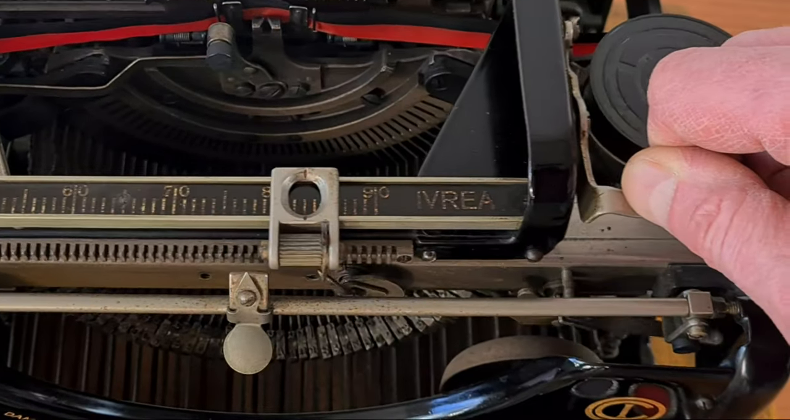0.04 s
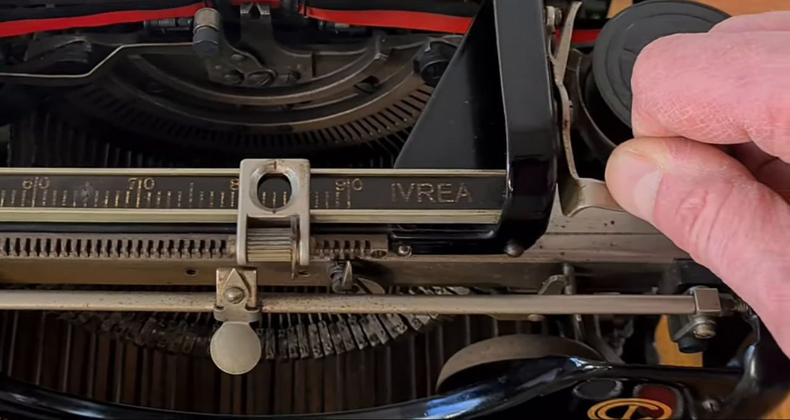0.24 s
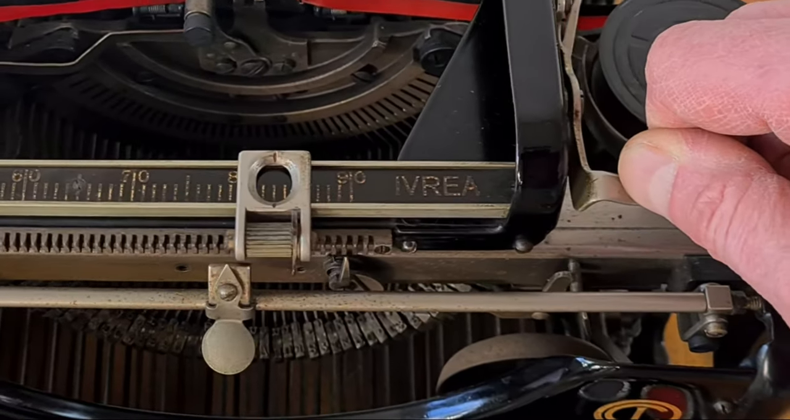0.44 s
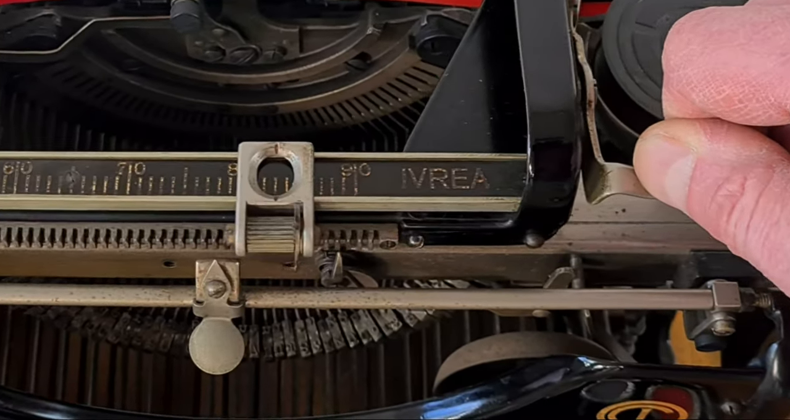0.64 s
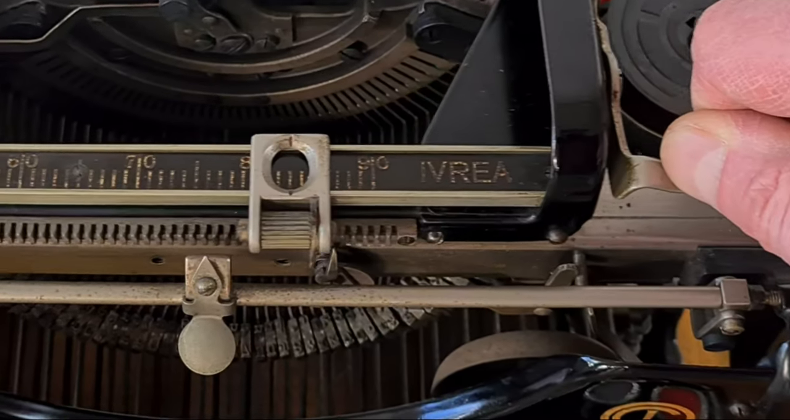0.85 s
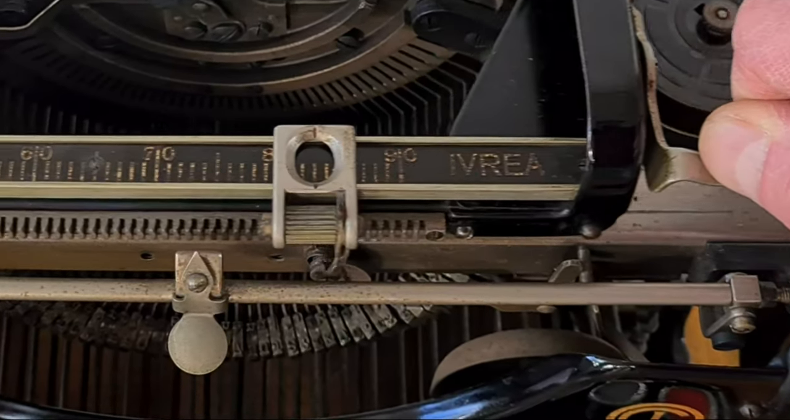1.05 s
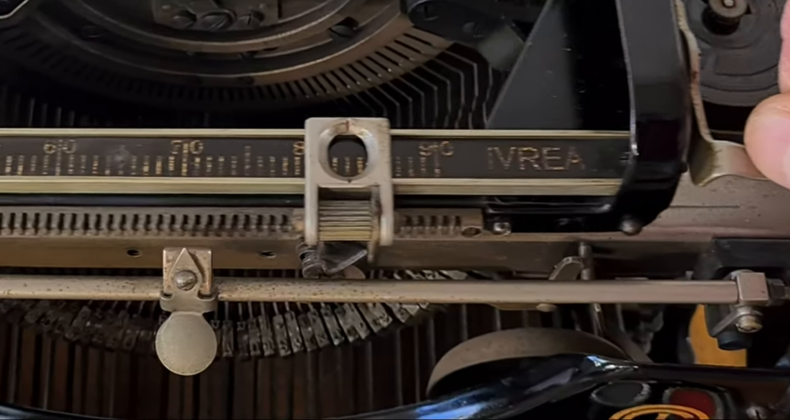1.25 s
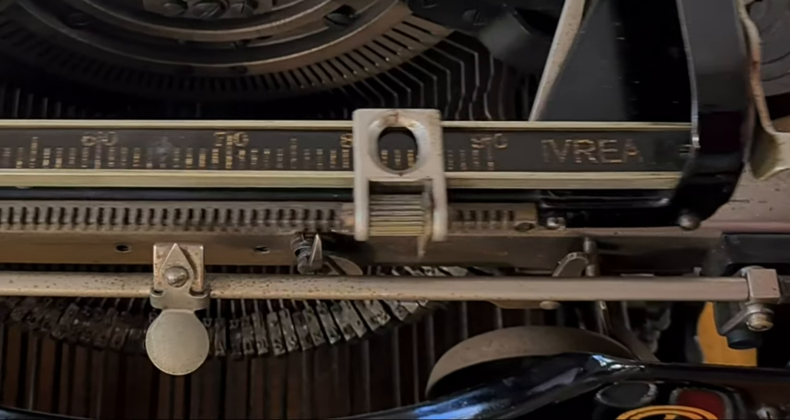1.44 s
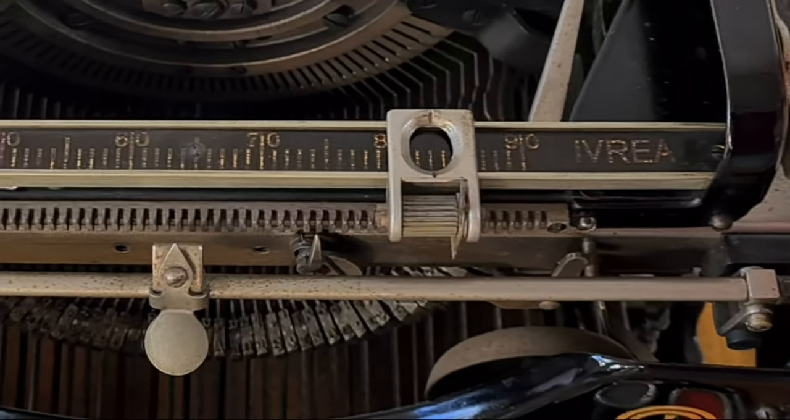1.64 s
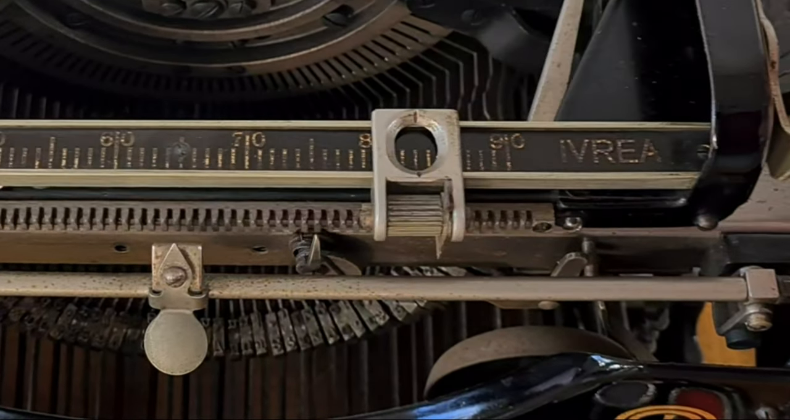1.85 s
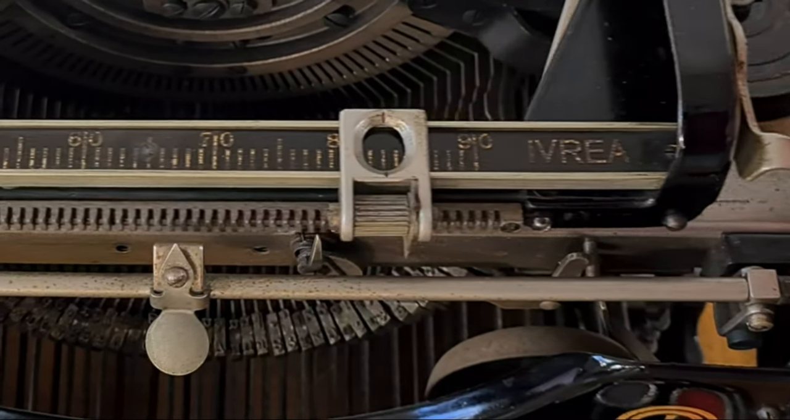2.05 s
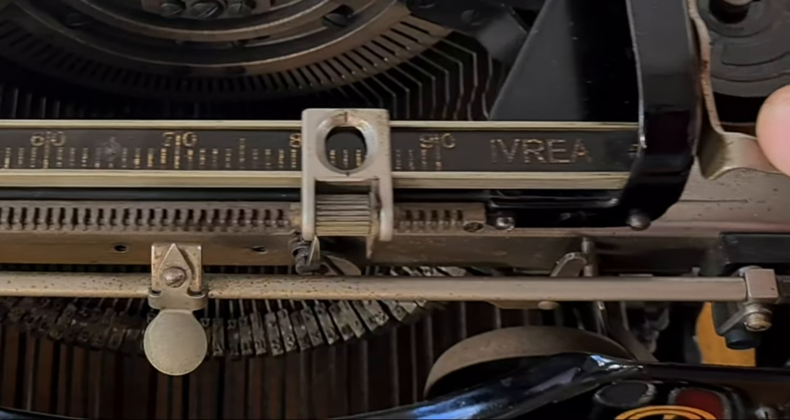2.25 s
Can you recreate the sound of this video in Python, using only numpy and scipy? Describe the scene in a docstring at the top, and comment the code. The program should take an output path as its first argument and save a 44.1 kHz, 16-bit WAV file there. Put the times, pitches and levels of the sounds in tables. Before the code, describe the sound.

Single bright ding of an old typewriter's margin bell, then a sharp metal click a second later.

```python
"""A small room with a low rumble and faint hiss, heard in stereo from close beside an old typewriter.
A hand slides the carriage along and the margin bell dings: the clapper makes the frame clack (coloured
noise and wavering sine modes) and the little bell rings on as decaying sines, mostly in beating pairs.
Faint ticks of shaped noise follow from the carriage. A second after the ding the trip pawl snaps back
with a dry click, noise and short sine modes, then hums briefly as it comes to rest."""
import sys
import numpy as np
from scipy import signal
from scipy.fft import rfft, irfft
from scipy.io import wavfile

SR = 44100
rng = np.random.default_rng(int(sys.argv[2]) if len(sys.argv) > 2 else 0)


def wrap_up_sound(samples):
    """Save the sound to the file named by the first command line argument, as 16-bit audio."""
    columns = np.atleast_2d(samples).T
    # keep every value between -1 and 1, then stretch to whole-number steps
    tamed = np.clip(columns, -1, 1)
    steps = np.round(tamed * 32767).astype(np.int16)
    wavfile.write(sys.argv[1], SR, steps)


N = 101430   # 2.3 s
STRIKE_S = 0.2283   # the bell and the frame start to ring
SIDES = np.array([[1], [-1]])   # left, right


def from_db(db):
    """Decibels to gain."""
    return 10 ** (np.asarray(db) / 20)


def at_hz(points, hz):
    """Read a table on a log-frequency axis."""
    f, value = np.transpose(points)
    return np.interp(np.log(np.maximum(hz, 1)), np.log(f), value)


def spectrum_hz():
    """Frequencies of the spectrum of a whole-scene signal."""
    return np.arange(N // 2 + 1) * SR / N


def since(s):
    """Seconds since a moment, zero before it."""
    return np.maximum(np.arange(N) / SR - s, 0)


def spread(amount):
    """Half of an amount to the left, minus half to the right."""
    return SIDES * amount / 2


def envelope(t, rise, t60):
    """Quick rise (time constant in s), then exponential decay by 60 dB in t60 seconds."""
    return (1 - np.exp(-t / rise)) * np.exp(-np.log(1000) * t / t60)


def noise(colour, likeness):
    """Stereo noise of a given colour and left-right likeness (correlation), mixed from mid and side; rms 1."""
    mid, side = rfft(rng.standard_normal((2, N)))
    alike = np.clip(likeness, -1, 1)
    stereo = np.sqrt(1 + alike) * mid + np.sqrt(1 - alike) * side * SIDES
    x = irfft(stereo * from_db(at_hz(colour, spectrum_hz())), N)
    return x / np.sqrt(np.mean(x ** 2))


RIPPLE_DB, RIPPLE_STEP_HZ = 1.5, 110.5   # standard deviation and spacing of the peaks and valleys


def uneven(colour):
    """A colour broken up into many random peaks and valleys, as crowded metal resonances give."""
    hz = np.arange(1, 200) * RIPPLE_STEP_HZ
    return np.c_[hz, at_hz(colour, hz) + RIPPLE_DB * rng.standard_normal(len(hz))]


# decay of the small room: pitch_hz, t60_s
ROOM_DECAY = [(200, .6), (1000, .55), (4000, .6), (8000, .42), (15000, .36)]
ROOM_RISE_S, ROOM_LIKENESS = 0.008, 0.15


def room_tail(colour, s):
    """Diffuse tail of one contact: crossfaded bands of one noise, dying fastest at the top."""
    hz, t = spectrum_hz(), since(s)
    wash = rfft(noise(colour, ROOM_LIKENESS))
    centres = np.array(ROOM_DECAY)[:, 0]
    tail = 0
    for (_, t60), share in zip(ROOM_DECAY, np.eye(len(ROOM_DECAY))):
        band = irfft(wash * at_hz(np.c_[centres, share], hz), N)
        tail = tail + band * envelope(t, ROOM_RISE_S, t60)
    return tail


CONTACT_RISE_S, AFTER_RING_T60_S, CONTACT_LIKENESS = 0.0008, 0.17, 0.31


def clatter(contacts, colour, crack_t60, ring_db, room_db):
    """Each contact is a noise crack with a longer ring of dense metal resonances, and the room answers.

    ring_db and room_db are relative to the crack."""
    colour = uneven(colour)
    out = 0
    for s, db, pan in contacts:
        t = since(s)
        crack = envelope(t, CONTACT_RISE_S, crack_t60)
        after_ring = from_db(ring_db) * envelope(t, CONTACT_RISE_S, AFTER_RING_T60_S)
        direct = (crack + after_ring) * noise(colour, CONTACT_LIKENESS)
        room = from_db(room_db) * room_tail(colour, s)
        out = out + from_db(db + spread(pan)) * (direct + room)
    return out


MODE_RISE_S = 0.0011
MODE_SPREAD_RAD = 0.69   # standard deviation of the left-right phase difference
FLUTTER, FLUTTER_HZ = 0.77, 80   # the loose parts' ring wavers: depth (standard deviation), rate


def ring(modes, s, rise, pan_db):
    """The clear modes of a loose metal part; each wavers and reaches the two sides a little out of step."""
    t = since(s)
    out = 0
    for hz, db, t60 in modes:
        steps = rng.standard_normal(size=200)
        waver = 1 + FLUTTER * np.interp(t * FLUTTER_HZ, np.arange(len(steps)), steps)
        lead = MODE_SPREAD_RAD * rng.standard_normal()
        tone = np.sin(2 * np.pi * hz * t + spread(lead))
        out = out + from_db(db + spread(pan_db)) * waver * envelope(t, rise, t60) * tone
    return out


# colour of the low rumble and room tone: pitch_hz, relative level_db (per Hz)
RUMBLE_COLOUR = [(20, -34), (33, -20.5), (46, -3.5), (60, 7), (72, -10.5), (90, -2), (120, -23), (210, -26),
                 (270, -34.5), (370, -32), (740, -37.5), (910, -47), (1400, -40), (2000, -61.5),
                 (4400, -89.5)]
# swell of the rumble, only its departures from the mean count: start_s, level_db
RUMBLE_SWELL = [(0.0, -59), (0.44, -60.5), (0.74, -60), (0.78, -63), (1.05, -57.5), (1.13, -65),
                (1.19, -58), (2.17, -63), (2.25, -57.5), (2.3, -60.5)]
# colour of the faint hiss: pitch_hz, relative level_db (per Hz)
HISS_COLOUR = [(1500, -6), (3000, -8), (6000, -11), (10000, -12), (15500, -12)]
# level of the hiss: start_s, level_db
HISS_FADE = [(.2, -82), (0.499, -93), (2.3, -89.5)]
# how alike the two sides are, for rumble and hiss: pitch_hz, likeness (correlation)
BACKGROUND_LIKENESS = [(60, 0.97), (150, 1), (600, 0.29), (3000, .4)]
RUMBLE_DB = -58.5   # mean level


def background():
    """A low rumble that swells and sinks, under a faint hiss; both are coloured noise."""
    likeness = at_hz(BACKGROUND_LIKENESS, spectrum_hz())
    s, db = np.transpose(RUMBLE_SWELL)
    swell_db = np.interp(since(0), s, db - db.mean())
    rumble = from_db(RUMBLE_DB + swell_db) * noise(RUMBLE_COLOUR, likeness)
    hiss_db = np.interp(since(0), *np.transpose(HISS_FADE))
    return rumble + from_db(hiss_db) * noise(HISS_COLOUR, likeness)


# the clapper's contacts: start_s, level_db, left_minus_right_db
CLAPPER_CONTACTS = [(.2275, -26.5, -2), (.2290, -27, -1)]
# colour of the clack: pitch_hz, relative level_db (per Hz)
CLAPPER_COLOUR = [(100, -15), (190, -7), (280, -14), (500, -11), (680, -7), (850, -1.5), (1500, -3),
                  (2100, -7.5), (3500, -5), (7000, -12), (12000, -7.5), (15500, -3)]
# frame modes shaken by the clapper: pitch_hz, level_db, t60_s
FRAME_MODES = [(371, -62.5, .45), (484, -59, .45), (524, -48.5, .08), (880, -58.5, 0.032), (910, -37, .11),
               (925, -57.5, 0.32), (1425, -40, .12), (1497, -52, 0.48), (1570, -54, .35), (2950, -48, .08),
               (4740, -42.5, .12), (4855, -55.5, 0.52), (11935, -34.5, 0.066)]


def clapper():
    """The clack of the clapper's contacts and the modes of the frame that carries it."""
    clack = clatter(CLAPPER_CONTACTS, CLAPPER_COLOUR, crack_t60=0.042, ring_db=-13.5, room_db=-20)
    return clack + ring(FRAME_MODES, STRIKE_S, MODE_RISE_S, pan_db=2)


# bell partials, mostly close pairs, plus a short early ring near 5.8 kHz, mostly on the right: pitch_hz,
# level_db (before BELL_TRIM_DB), t60_s, # left_minus_right_db, # left_lead_rad (phase by which the left leads
# the right)
BELL_MODES = [ (2445.5, -43, 2.9, 10, 3.0), (2500.1, -54.5, 5.1, 3, -1.2), (5801.9, -47, 2.9, 12, 3.0),
              (5807.6, -39.5, 3.5, -2, 0), (5811, -41, .7, -9, 3.1), (9567.9, -32.5, 1.1, -4.5, .6),
              (9583.6, -27, .9, 9.5, -.7), (13824, -24, .35, -6, 1.0), (15615, -42, .17, 0, 1.0), ]
BELL_TRIM_DB = 0.62
SWELL_CYCLES = 51   # time constant of each partial's rise, in its own cycles
FIRST_TROUGH_S = 0.023   # neighbouring partials oppose each other this long after the strike


def bell():
    """One ding; the twins of each pair beat against each other as they fade."""
    t = since(STRIKE_S)
    out = 0
    for k, (hz, db, t60, pan, lag) in enumerate(BELL_MODES):
        sign = (-1) ** k   # alternate signs put neighbours in opposition
        level = sign * from_db(BELL_TRIM_DB + db + spread(pan))
        # a negative SIDES entry is the right, so the phase shift falls there
        tone = np.sin(2 * np.pi * hz * (t - FIRST_TROUGH_S) - lag * (SIDES < 0))
        out = out + level * envelope(t, SWELL_CYCLES / hz, t60) * tone
    return out


# faint ticks of the sliding carriage: start_s, level_db, left_minus_right_db
CARRIAGE_TICKS = [(1.0215, -58, 4.5), (1.183, -75, 4), (2.137, -72, 7)]
# colour of the ticks: pitch_hz, relative level_db (per Hz)
CARRIAGE_COLOUR = [(400, -8), (1100, -16), (1650, 11), (2200, -11), (4300, -1), (8000, -18), (15000, -2.5)]


def carriage():
    """Faint ticks as the carriage slides: very short metallic contacts."""
    return clatter(CARRIAGE_TICKS, CARRIAGE_COLOUR, crack_t60=0.01, ring_db=-13, room_db=-24)


# the pawl snaps back: start_s, level_db, left_minus_right_db
PAWL_CONTACTS = [(1.3152, -27.5, 1)]
# colour of the click: pitch_hz, relative level_db (per Hz)
PAWL_COLOUR = [(150, -17), (400, -15), (650, -0.5), (1400, 5.5), (2200, -5), (3200, -1), (4400, -2.5),
               (8000, -6), (11500, 6.5), (15500, 6.5)]
# modes of the pawl: pitch_hz, level_db, t60_s
PAWL_MODES = [(568, -61, 0.17), (1418, -40.5, 0.07), (1467, -62, 0.33), (4010, -60, 0.2), (4400, -72, 0.46),
              (4630, -64.5, 0.32), (6100, -44.5, 0.063), (11100, -57, 0.074), (14700, -61, 0.085)]
# the pawl hums briefly as it comes to rest: pitch_hz, level_db, t60_s
REST_MODES = [(1408, -61, 0.11)]
PAWL_PAN_DB, REST_AT_S, REST_RISE_S = 1, 1.452, 0.012


def pawl():
    """A bright, dry click with the brief ring of the pawl's modes, which then settles with a softer hum."""
    click = clatter(PAWL_CONTACTS, PAWL_COLOUR, crack_t60=0.026, ring_db=-15.5, room_db=-27.5)
    rings = sum(ring(PAWL_MODES, s, MODE_RISE_S, PAWL_PAN_DB) for s, _, _ in PAWL_CONTACTS)
    return click + rings + ring(REST_MODES, REST_AT_S, REST_RISE_S, PAWL_PAN_DB)


def scene():
    """Room tone, the clapper and its bell, the carriage and the pawl."""
    return background() + clapper() + bell() + carriage() + pawl()


def record(dry):
    """The top is cut steeply above 15.9 kHz by an elliptic low-pass."""
    lowpass = signal.ellip(10, 0.2, 70, 15900, fs=SR, output="sos")
    return signal.sosfilt(lowpass, dry)


dry = scene()
out = record(dry)
wrap_up_sound(out)
```